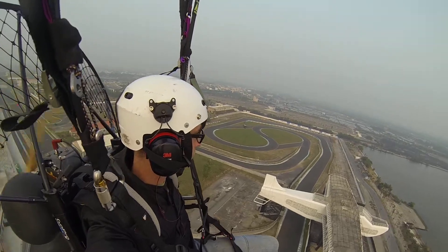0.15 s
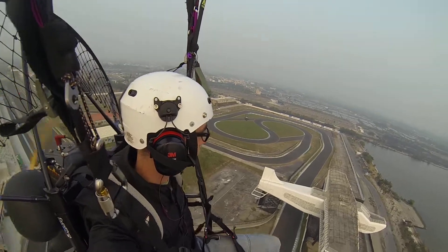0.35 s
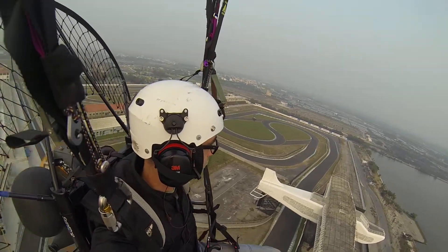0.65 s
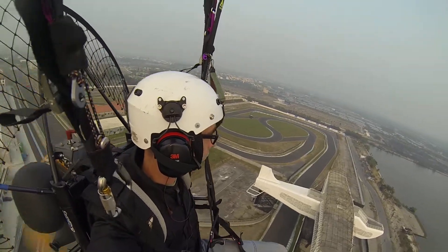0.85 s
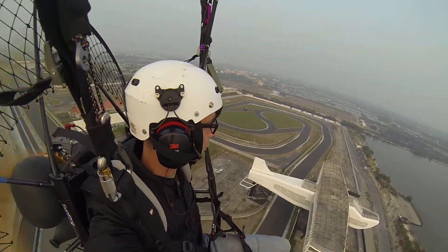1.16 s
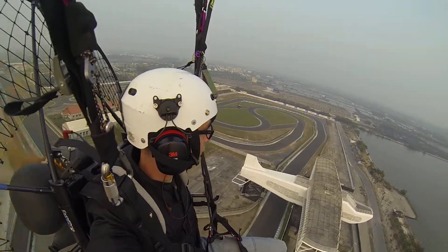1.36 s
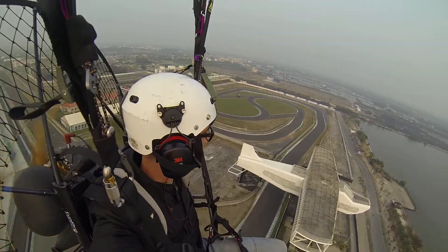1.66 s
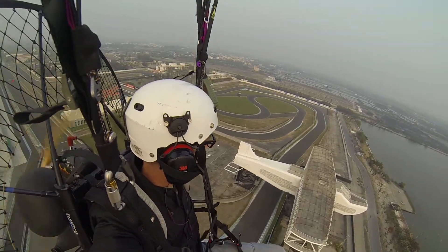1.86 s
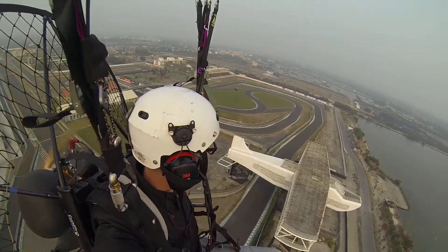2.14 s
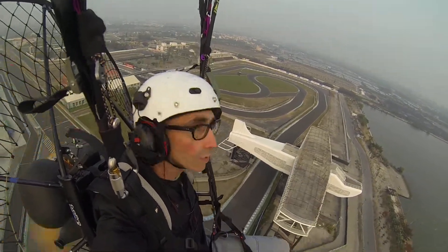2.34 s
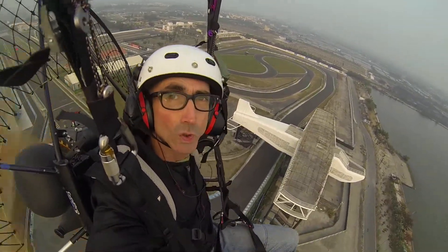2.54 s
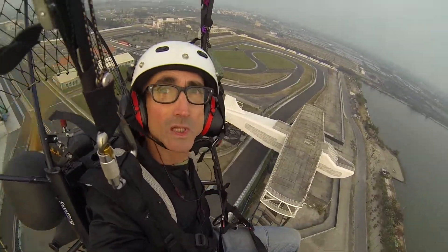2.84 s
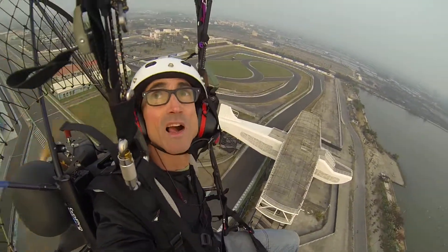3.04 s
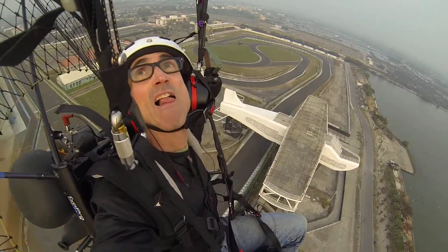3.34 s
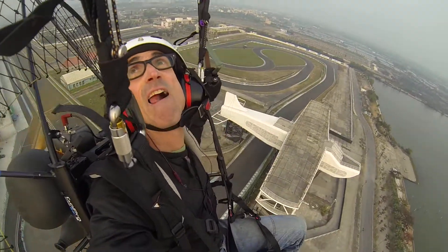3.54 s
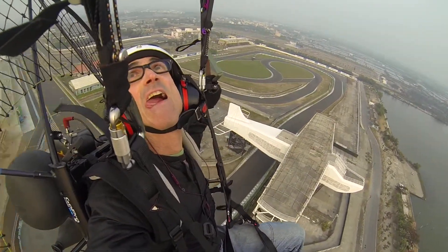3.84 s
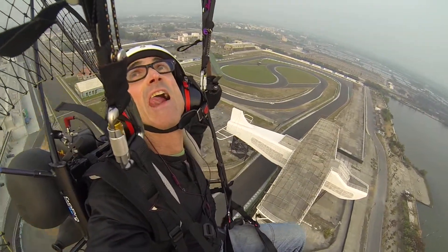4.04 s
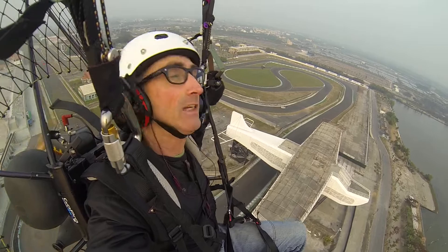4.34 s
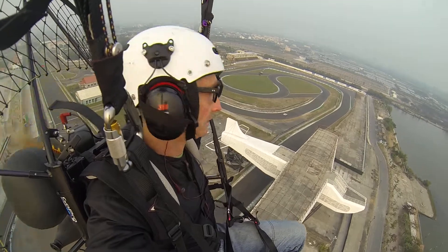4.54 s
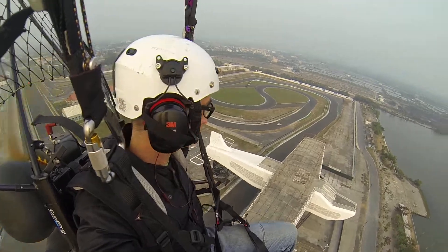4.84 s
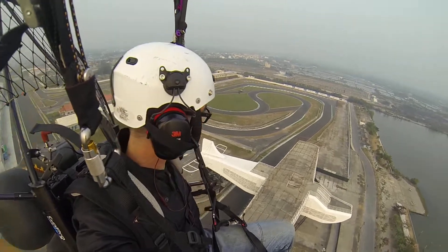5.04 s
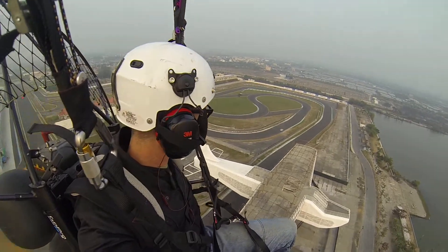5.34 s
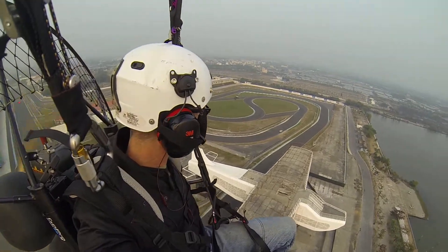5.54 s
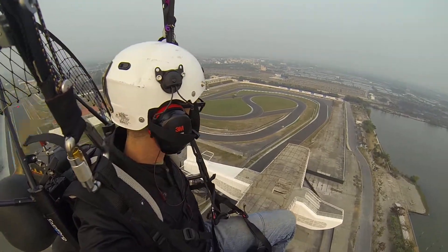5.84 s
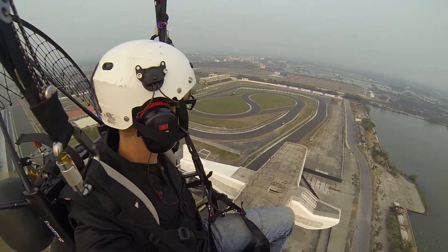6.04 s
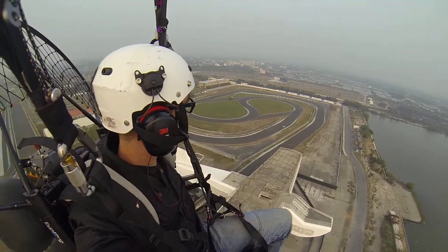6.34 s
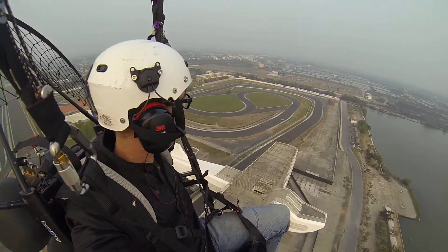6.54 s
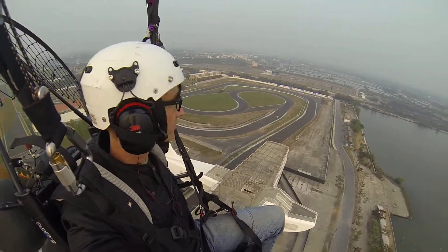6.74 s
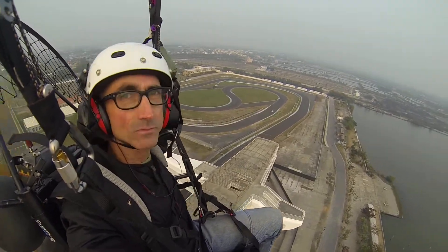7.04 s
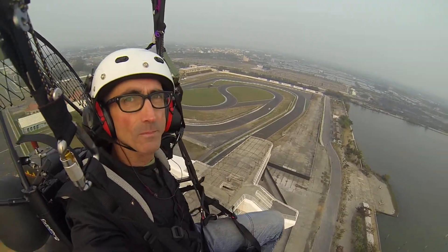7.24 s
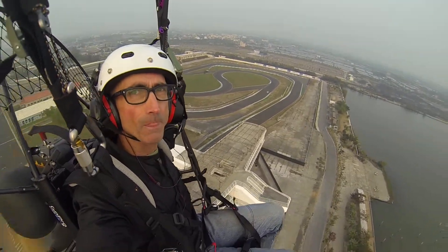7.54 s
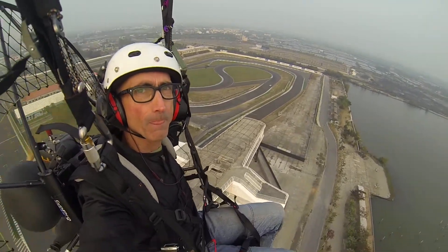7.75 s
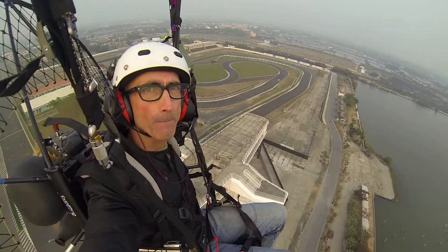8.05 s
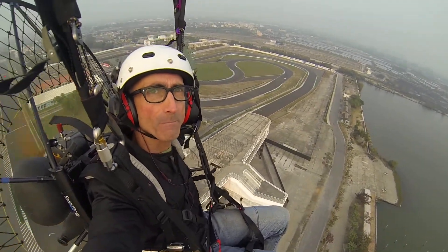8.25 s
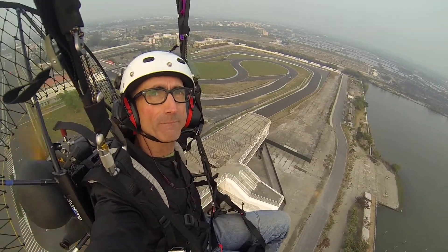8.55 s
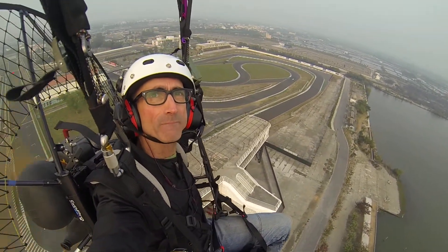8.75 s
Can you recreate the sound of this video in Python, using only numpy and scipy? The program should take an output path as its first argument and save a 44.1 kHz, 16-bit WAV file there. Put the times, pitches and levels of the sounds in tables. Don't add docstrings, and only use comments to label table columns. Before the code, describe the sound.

From 0 to about 8.9 seconds a small two-stroke engine and propeller run without a break, very close to a housed camera in open air. The blades chop turbulent wash roughly 47 to 50 times a second, making a harsh, boxy, fluttering roar strongest around 1.5 kHz, over a low engine buzz near 92 to 97 Hz and a faint fizz. It starts loudest and slightly higher, eases by 1.7 seconds, sags in pitch to its first low near 4.5, then holds almost level, softening and dropping slightly after 8. Engine and blade tones beat slowly. Hard hollow slaps strike irregularly, clustered around 1.0-1.7, 2.3-3.3, 4.5-5.0 and 6.6-7.1 seconds, with a pair near 8.4, among constant small knocks. Low wind lumps swell around 0.9, 2.7, 6.8 and 7.6. Dry, no echo, peaks slightly crushed.

```python
import sys
import numpy as np
from scipy import signal
from scipy.fft import rfft, irfft, next_fast_len
from scipy.io import wavfile
from scipy.ndimage import uniform_filter1d, map_coordinates

SR = 44100
rng = np.random.default_rng(int(sys.argv[2]) if len(sys.argv) > 2 else 0)


def dump(signal):
    limited = np.clip(np.atleast_2d(signal).T, -1, 1)
    pcm = np.round(limited * 32767).astype(np.int16)
    wavfile.write(sys.argv[1], SR, pcm)


def invert_db(x):
    u = np.asarray(x, float) / 20
    return 10 ** u


N = 392049

# [t/s, firing f/Hz, blade pass f/Hz]
SPEED = [(0.0, 97.31, 49.83), (0.4, 96.19, 49.58), (0.9, 96.01, 49.21), (1.5, 96.02, 49.32),
         (2.1, 95.49, 49.0), (2.7, 95.47, 48.89), (3.2, 94.65, 48.61), (3.7, 93.29, 47.67),
         (4.1, 92.61, 47.36), (4.5, 91.39, 46.24), (4.9, 92.12, 46.48), (5.4, 92.37, 46.82),
         (6.0, 92.03, 46.79), (6.6, 92.47, 46.75), (7.2, 92.23, 46.82), (7.8, 92.02, 46.54),
         (8.4, 91.68, 46.68), (8.89, 91.14, 45.49)]
# [t/s, level/dB]
LOAD = [
    (0, -20),
    (.8, -21.5),
    (1.7, -22),
    (2.8, -21.5),
    (3.4, -22),
    (4, -22.5),
    (5.5, -22.5),
    (6.8, -22),
    (7.6, -22.5),
    (8.89, -24),
]
# [t/s, blade loading level/dB, frame shake level/dB]
STRAIN = [(0, -37, -30.5), (.9, -35, -38.5), (1.4, -35.5, -37.5), (2.4, -30.5, -29), (2.9, -34, -33.5),
          (3.9, -27, -33.5), (4.9, -29.5, -33.5), (6.4, -35.5, -33), (6.9, -35, -31.5), (7.5, -38, -26),
          (8.1, -30, -27.5), (8.89, -36, -23.5)]
# [t/s, peak level/dB, ring f/Hz]
STRIKES = [(0.0384, -11, 1590), (0.378, -5.5, 1390), (0.7027, -7, 1470), (1.05, -8, 1610),
           (1.1326, -5.5, 1510), (1.25, -5.5, 1460), (1.4963, -8, 1430), (1.6197, -6.5, 1510),
           (1.6571, -6, 1440), (2.3097, -8, 1480), (2.4334, -7, 1420), (2.5737, -9, 1560),
           (3.0882, -8, 1570), (3.1296, -6, 1560), (3.254, -5.5, 1310), (3.711, -7, 1520),
           (4.4737, -7.5, 1350), (4.4967, -10, 1460), (4.795, -9.5, 1570), (4.9702, -10, 1580),
           (4.9921, -6.5, 1480), (5.9558, -8.5, 1460), (6.017, -11, 1470), (6.5934, -6.5, 1480),
           (6.765, -6, 1470), (6.8262, -6, 1580), (6.9175, -6.5, 1520), (7.148, -9, 1490),
           (8.3722, -9, 1270), (8.435, -10, 1560)]
# [f/Hz, level/dB per Hz]
WASH_SPECTRUM = [(20, -21), (60, -19), (150, -20), (400, -19.5), (900, -19.5), (2000, -16.5), (4000, -28),
                 (4600, -37.5), (6000, -90), (15000, -120)]
# [f/Hz, width/Hz, level/dB]
HOUSING = [(1270, 135, 9.5), (1560, 156, 13.5), (1842, 80, -7), (2327, 68, -4), (2593, 52, 4.5),
           (2850, 72, -10.5), (3940, 70, -3), (3502, 258, 8.5), (4330, 53, -4.5), (6500, 136, -2.5),
           (10970, 280, 4), (13900, 420, 5)]
# [f/Hz, width/Hz, level/dB]
PANELS = [(1392, 22, -9.5), (3205, 68, 4), (3330, 48, -1), (3650, 70, 2), (4280, 19, 7.5), (4270, 50, -0.5),
          (4600, 23, -3.5), (4666, 36, 7.5), (6120, 60, 2.5), (6500, 40, -0.5), (6830, 30, -5),
          (6950, 40, 3), (8300, 74, -3)]
CRUISE_HZ = 92.2
THIRD_DB, THIRD_DB_PER_HZ = -47, -2.5


def unit(x):
    return x / np.sqrt(np.mean(x ** 2) + 1e-20)


def curves(rows):
    s, *cols = np.transpose(rows)
    return [np.interp(np.arange(N) / SR, s, c) for c in cols]


def wobble(rate):
    knots = rng.standard_normal(int(N * rate / SR) + 4)
    coarse = map_coordinates(knots, [np.arange(0, N + 32, 32) * rate / SR])
    return np.interp(np.arange(N), np.arange(len(coarse)) * 32, coarse)


def coloured(x, points, modes=()):
    m = next_fast_len(N + 8192)
    hz = np.fft.rfftfreq(m, 1 / SR)
    f, v = np.transpose(points)
    db = np.interp(np.log(hz + 1), np.log(f + 1), v)
    db = db + sum(g * np.exp(-.5 * ((hz - c) / w) ** 2) for c, w, g in modes)
    return irfft(rfft(x, m) * invert_db(db), m)[..., :N]


def stack(turns, first, levels, flutter_db, flutter_rate, drift):
    neper = flutter_db * np.log(10) / 20
    total = 0
    for k, db in enumerate(levels, first):
        size = np.sqrt(2) * invert_db(db) * np.exp(neper * wobble(flutter_rate))
        total = total + size * np.cos(2 * np.pi * k * turns + drift * wobble(flutter_rate))
    return total


def puffs(turns, sharp, scatter_db):
    size = invert_db(scatter_db * rng.standard_normal(4000))[np.round(turns).astype(int)]
    return size * np.exp(sharp * (np.cos(2 * np.pi * turns) - 1))


def revs():
    return curves(SPEED)[0] - CRUISE_HZ


def follows(share):
    load_db, = curves(LOAD)
    return share * (load_db - load_db.mean())


def fizz_level():
    return -45.5 + 0.53 * revs() + follows(0.18)


def firing_thump():
    return invert_db(curves(STRAIN)[1])


def exhaust_drone(fire):
    multiples = [0, -12, -11, -15, -18, -18, -16.5, -18.5, -21]
    drone_db = -32.5 + 0.34 * revs() + follows(0.44)
    drone = stack(fire - .045, first=2, levels=multiples[:1], flutter_db=0.7, flutter_rate=8.8, drift=0.12)
    overtones = stack(fire - .75, first=3, levels=multiples[1:], flutter_db=1.0, flutter_rate=2.5, drift=.4)
    return invert_db(drone_db) * (drone + overtones)


def casing_whine(fire):
    multiples = [-16, 1, -33, -34, -12, -39, 0]
    whine_db = np.minimum(-43 + 4.5 * revs(), -33)
    return invert_db(whine_db) * stack(fire, first=11, levels=multiples, flutter_db=1.2, flutter_rate=4, drift=.45)


def cover_plates(fire):
    # [firing multiple, f/Hz, width/Hz, level/dB]
    plates = [
        (11, 1060, 9, -41),
        (13, 1190, 20, -38),
        (18, 1660, 25, -37),
    ]
    total = 0
    for k, hz, width, db in plates:
        tone = stack(fire, first=k, levels=[db], flutter_db=1.5, flutter_rate=5, drift=.5)
        total = total + tone / np.hypot(1, (k * (revs() + CRUISE_HZ) - hz) / width)
    return total


def fin_rattle(fire):
    fins = stack(fire - .2, first=14, levels=np.zeros(25), flutter_db=2.6, flutter_rate=1.6, drift=1.3)
    return invert_db(-32 + .7 * revs()) * unit(coloured(fins, [(1500, -0.5), (3500, -4)], HOUSING))


def engine(fire):
    thump = stack(fire - .38, first=1, levels=[0], flutter_db=-1.1, flutter_rate=5.6, drift=0.17)
    thump = firing_thump() * thump
    return thump + exhaust_drone(fire) + casing_whine(fire) + cover_plates(fire) + fin_rattle(fire)


def propeller(blade):
    multiples = [-84, -54.5, -53, -47.5, -52, -53.5, -51, -50, -56.5]
    bite_db = curves(STRAIN)[0]
    beat = stack(blade + 0.14, first=1, levels=[0], flutter_db=1.8, flutter_rate=7.8, drift=0.16)
    octave = stack(blade + .075, first=2, levels=[-39.5], flutter_db=1.5, flutter_rate=2.5, drift=0.15)
    third = stack(blade + .01, first=3, levels=[THIRD_DB], flutter_db=1.2, flutter_rate=4, drift=0.25)
    upper = stack(blade + 0.065, first=4, levels=multiples, flutter_db=1.8, flutter_rate=2, drift=0.6)
    octave = invert_db(0.4 * (bite_db - bite_db.mean())) * octave
    return invert_db(bite_db) * beat + octave + invert_db(THIRD_DB_PER_HZ * revs()) * third + upper


def tip_tick(blade):
    # [f/Hz, level/dB per Hz]
    spectrum = [(3800, -71), (4700, -1.5), (5300, 1), (6000, -12), (7500, -60)]
    tick = puffs(blade - .05, sharp=4.0, scatter_db=-1.0) * coloured(rng.standard_normal(N), spectrum)
    return invert_db(-56.5 + 1.46 * revs() + 1.9 * wobble(3.01)) * unit(tick)


def mixing(fire, blade):
    bite_db = curves(STRAIN)[0]
    low = stack(fire - blade + 0.21, first=1, levels=[-40], flutter_db=1, flutter_rate=1.5, drift=.3)
    total = stack(fire + blade + .39, first=1, levels=[THIRD_DB - 2.5], flutter_db=1.2, flutter_rate=3,
                  drift=.25)
    second_low = stack(2 * fire - blade - .03, first=1, levels=[-50.5], flutter_db=5.0, flutter_rate=2.6,
                       drift=.4)
    second_sum = stack(2 * fire + blade, first=1, levels=[-53], flutter_db=-0.5, flutter_rate=2.96,
                       drift=0.67)
    low = invert_db(1.4 * (bite_db - bite_db.mean())) * low
    return low + invert_db(THIRD_DB_PER_HZ * revs()) * total + second_low + second_sum


def wash(fire, blade):
    # [f/Hz, level/dB per Hz]
    fizz_spectrum = [(3000, -66), (4300, -9.5), (4900, -2.5), (6300, -7), (8000, -13), (10000, -21.5),
                     (12500, -25), (15000, -27.5)]
    exhaust = 0.4 * puffs(fire - .2, sharp=12, scatter_db=2.5)
    exhaust = exhaust + 0.35 * puffs(fire - .83, sharp=8, scatter_db=1.5)
    chop = 2.3 + 1.45 * puffs(blade - .01, sharp=1.0, scatter_db=1.2) + exhaust
    gusting = invert_db(0.46 * wobble(7) + 0.39 * wobble(25) + 0.19 * wobble(250))
    roar = chop * gusting * rng.standard_normal(N)
    lull = np.bincount(np.round(np.transpose(STRIKES)[0] * SR).astype(int), minlength=N)[:N]
    roar = roar * (1 - .8 * np.clip(signal.fftconvolve(lull, np.hanning(500), "same"), 0, 1))
    swish = 1.5 + 1.25 * puffs(blade - .04, sharp=3.4, scatter_db=1.0) + 0.65 * exhaust
    swish = swish + .3 * puffs(fire - .5, sharp=6, scatter_db=2.5)
    fizz = swish * invert_db(0.27 * wobble(20) + 0.32 * wobble(300)) * rng.standard_normal(N)
    roar = invert_db(curves(LOAD)[0] - 1.01) * unit(coloured(roar, WASH_SPECTRUM, HOUSING + PANELS))
    return roar + invert_db(fizz_level() + 0.1) * unit(coloured(fizz, fizz_spectrum, HOUSING + PANELS))


def knocks(blade):
    passes = np.flatnonzero(np.diff(np.floor(blade + 0.01)))
    late, size = rng.standard_normal((2, 2, 1000))[:, :, :len(passes)]
    delay = np.array([[.0003], [.0022]]) + .0007 * late
    at = np.clip(passes + SR * delay, 0, N - 1).astype(int)
    cracks = np.bincount(at.ravel(), size.ravel(), minlength=N)
    return invert_db(curves(LOAD)[0] - 11.5) * unit(coloured(cracks, WASH_SPECTRUM, HOUSING + PANELS))


def slaps(blade):
    out, t = np.zeros(N + SR), np.arange(600) / SR
    swell = (t / 0.0024) ** 2 * np.exp(2 - 2 * t / 0.0021)
    passes = np.flatnonzero(np.diff(np.floor(blade + 0.1006))) / SR
    luck, strength, pitch = rng.random((1000, 3))[:len(passes)].T
    strays = np.transpose([passes, -17 + 4 * strength, 1250 + 380 * pitch])[luck < .08]
    strikes = [*STRIKES, *strays]
    chances = rng.random((len(strikes), 4))
    for (s, db, hz), (start, edge_start, spread, sharp) in zip(strikes, chances):
        ring = np.sin(2 * np.pi * (hz * t + start))
        edge_db = -15.5 + 8.5 * (2 * sharp - 1.5)
        edge = invert_db(edge_db) * np.sin(2 * np.pi * ((3150 + 600 * spread) * t + edge_start))
        out[round(s * SR):][:len(t)] += invert_db(db) * swell * (ring + edge)
    return out[:N]


def buffet():
    # [f/Hz, level/dB per Hz]
    gusts = [(5, 4), (15, 13), (33, 5.5), (46, -10), (80, -11.5), (200, -26), (500, -120)]
    # [t/s, level/dB]
    airstream = [(0.0, -29.5), (0.86, -32), (0.91, -24), (1.26, -30.5), (2.47, -30), (2.7, -20.5),
                 (2.94, -36), (3.14, -24), (4.41, -26.5), (4.46, -26), (6.39, -26.5), (6.74, -29),
                 (6.83, -22.5), (7.2, -35), (7.6, -23), (8.47, -34.5), (8.59, -31), (8.89, -27)]
    lumps = invert_db(1.6 * wobble(12) + 0.64 * wobble(4.6)) * coloured(rng.standard_normal(N), gusts)
    return invert_db(curves(airstream)[0] + 0.54) * unit(lumps)


def scene():
    fire, blade = np.cumsum(curves(SPEED), axis=1) / SR
    tones = engine(fire) + propeller(blade) + tip_tick(blade) + mixing(fire, blade)
    return (tones + wash(fire, blade) + knocks(blade) + slaps(blade) + buffet())[None]


def roll_off(x):
    return signal.sosfilt(signal.butter(12, 15580, fs=SR, output="sos"), x)


def record(dry):
    # [f/Hz, level/dB]
    narrow_band = [(14920, 0), (15000, -50)]
    # [f/Hz, level/dB]
    wide_band = [(15230, 0), (15330, -50)]
    dry = dry / (1 + np.abs(dry / .64) ** 6) ** (1 / 6)
    narrow = coloured(dry, narrow_band)
    bright = uniform_filter1d(1. * (fizz_level() + 1.3 * wobble(35) > -44.2), size=600)
    mix = narrow + bright * (coloured(dry, wide_band) - narrow)
    return roll_off(mix)


dry = scene()
out = record(dry)
dump(out)
```